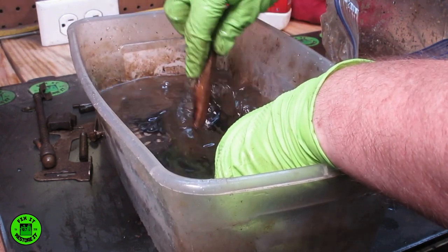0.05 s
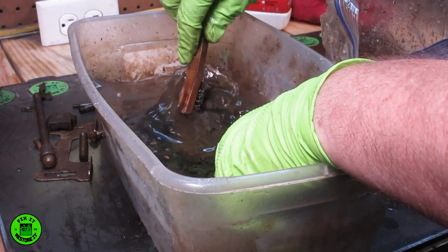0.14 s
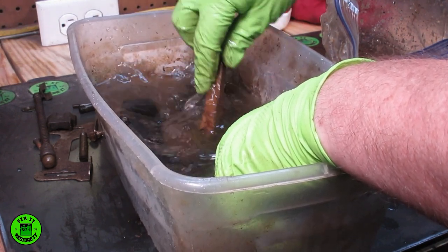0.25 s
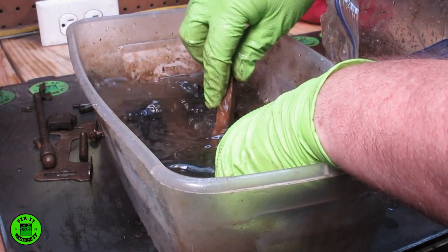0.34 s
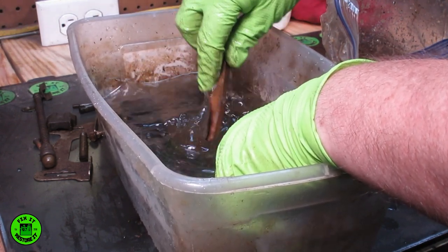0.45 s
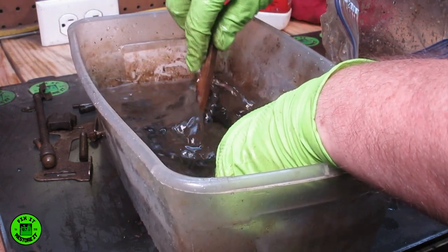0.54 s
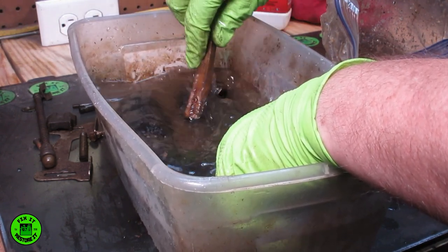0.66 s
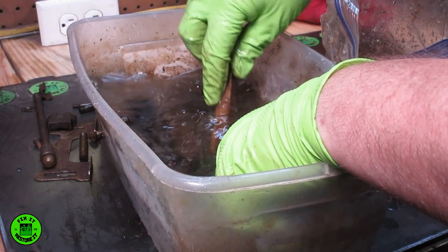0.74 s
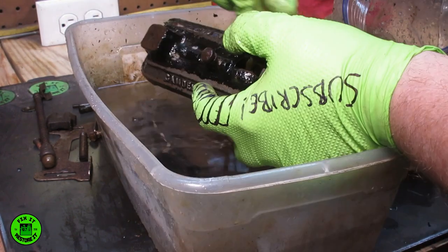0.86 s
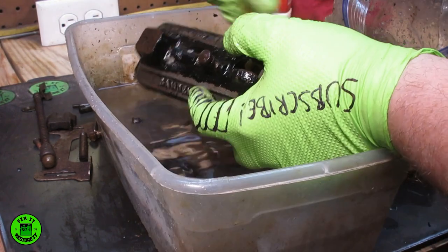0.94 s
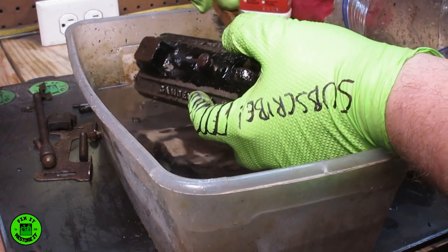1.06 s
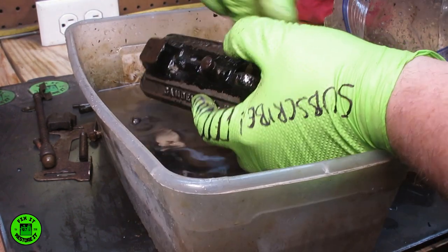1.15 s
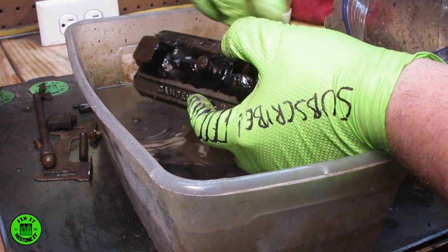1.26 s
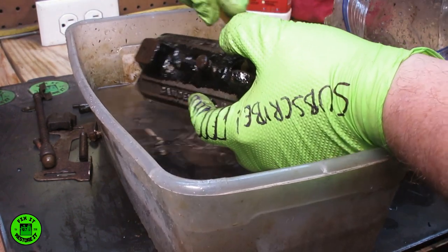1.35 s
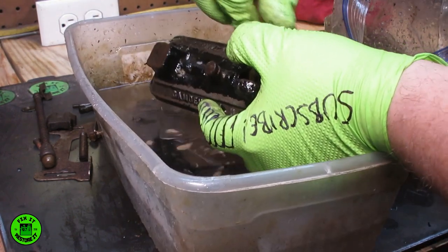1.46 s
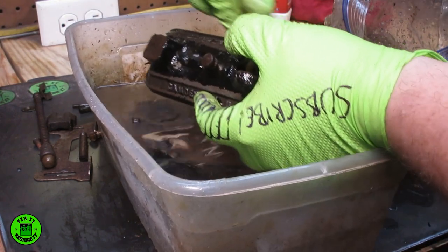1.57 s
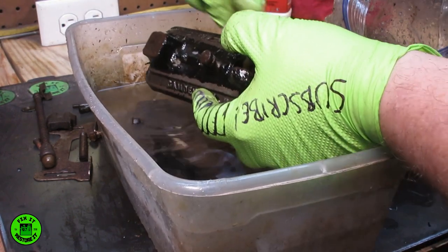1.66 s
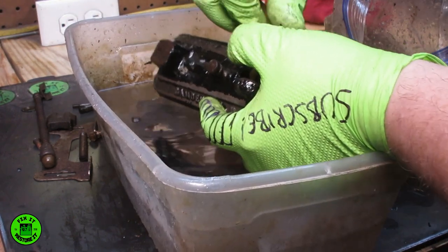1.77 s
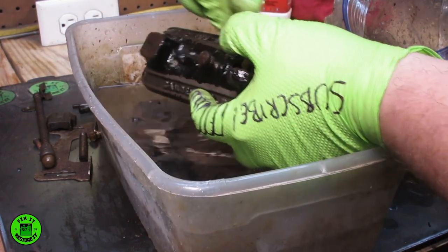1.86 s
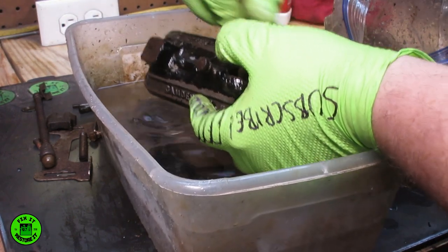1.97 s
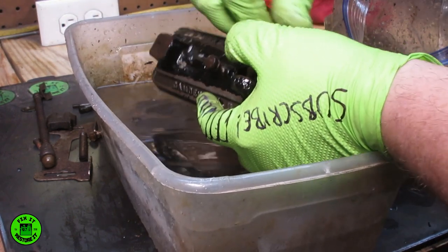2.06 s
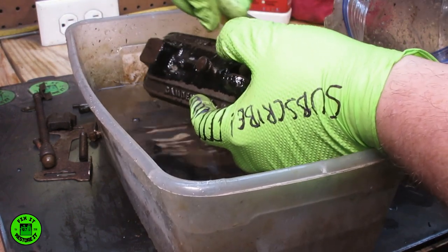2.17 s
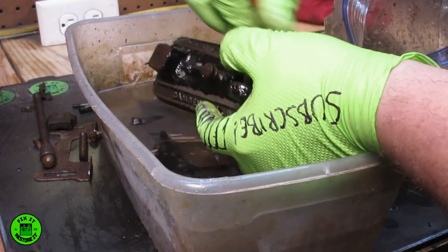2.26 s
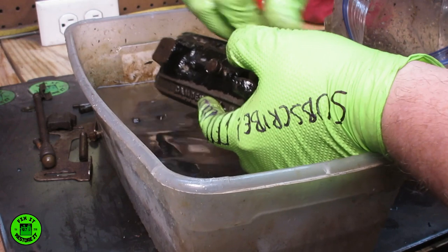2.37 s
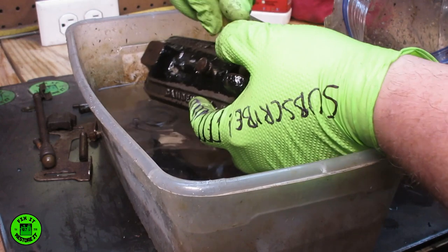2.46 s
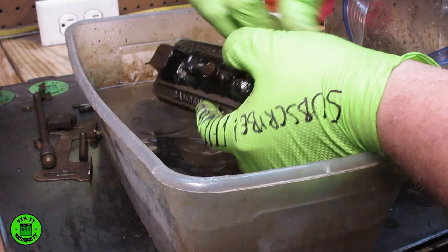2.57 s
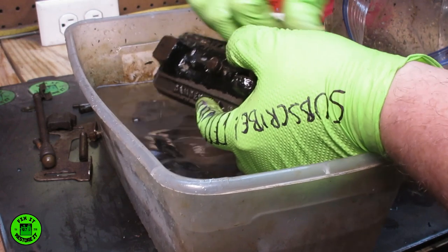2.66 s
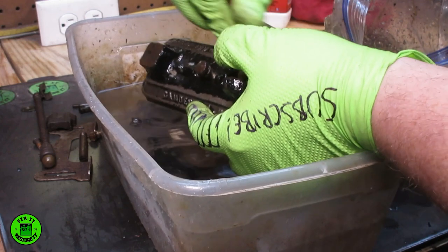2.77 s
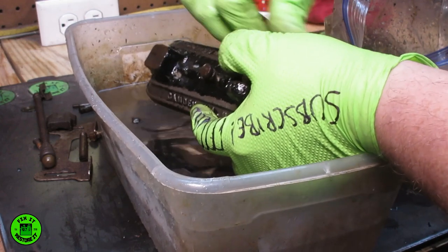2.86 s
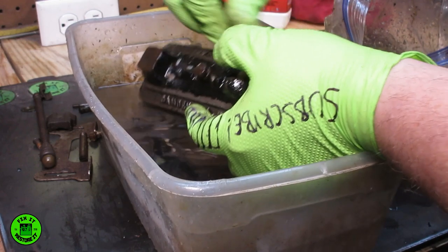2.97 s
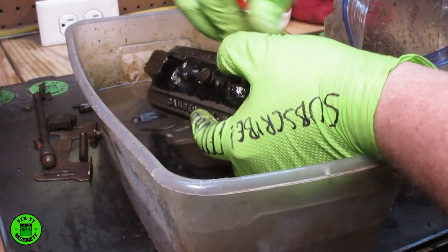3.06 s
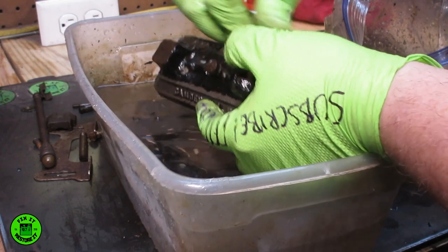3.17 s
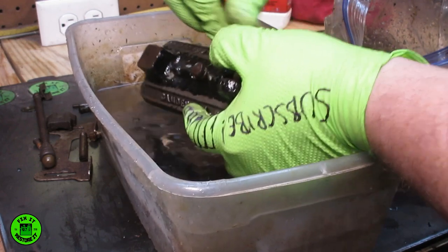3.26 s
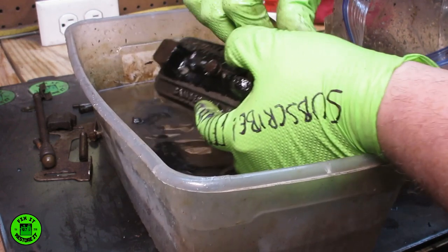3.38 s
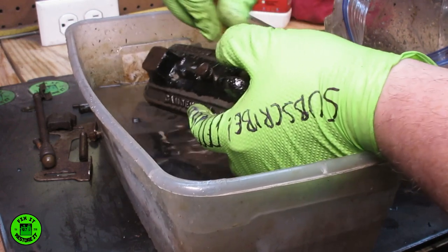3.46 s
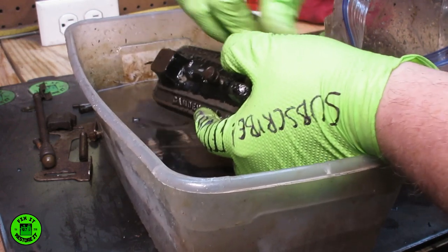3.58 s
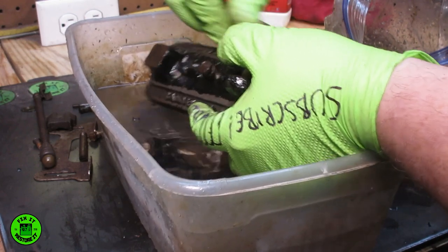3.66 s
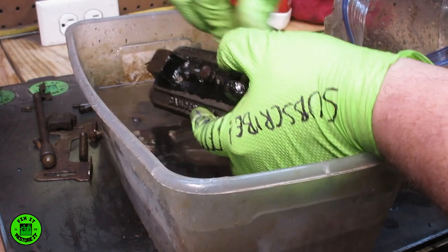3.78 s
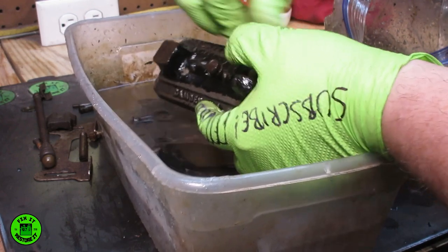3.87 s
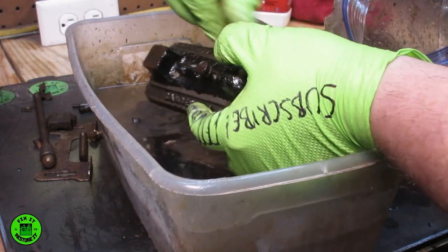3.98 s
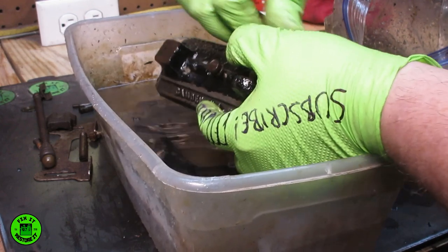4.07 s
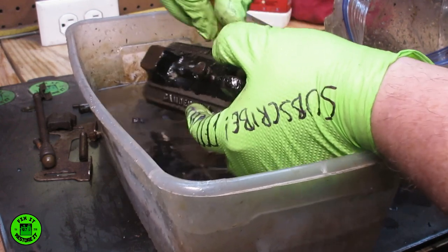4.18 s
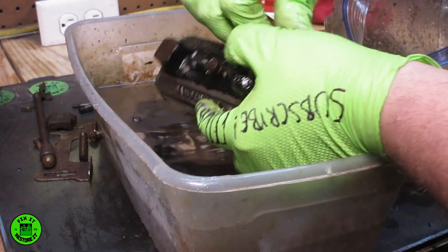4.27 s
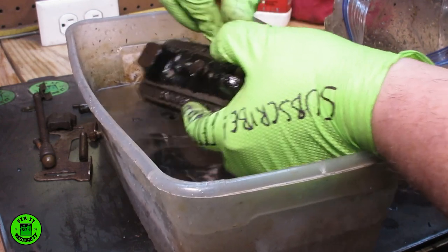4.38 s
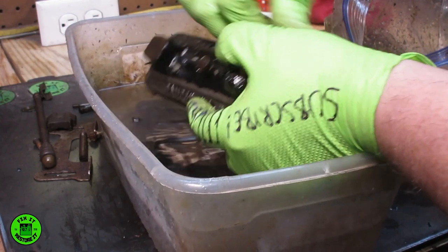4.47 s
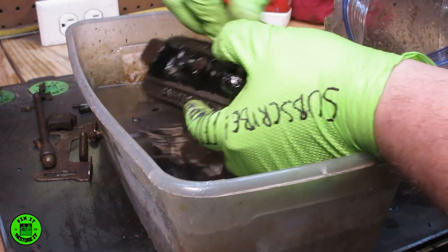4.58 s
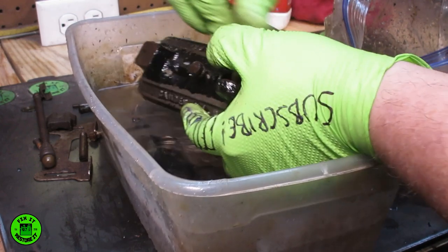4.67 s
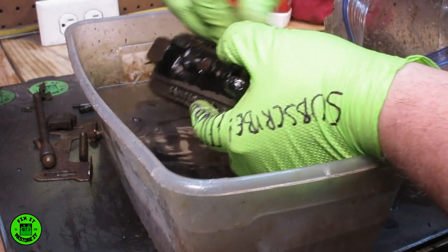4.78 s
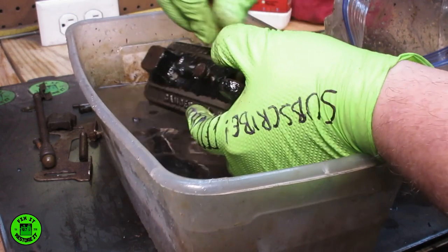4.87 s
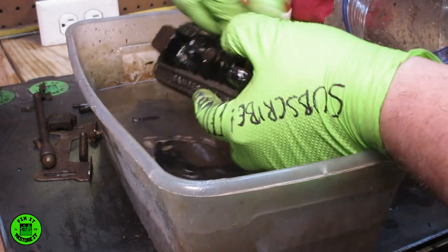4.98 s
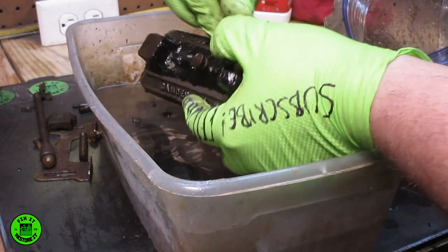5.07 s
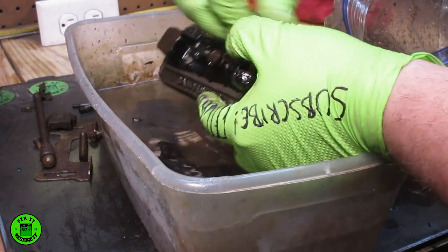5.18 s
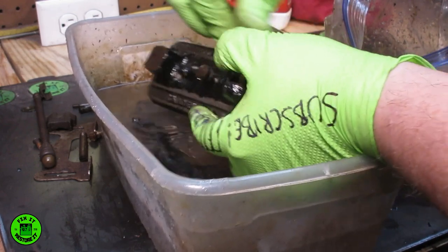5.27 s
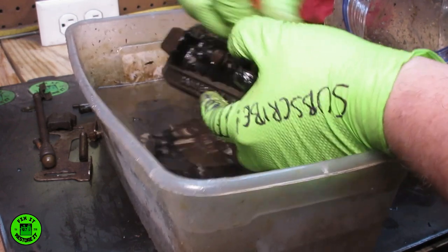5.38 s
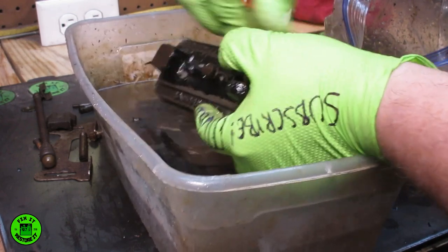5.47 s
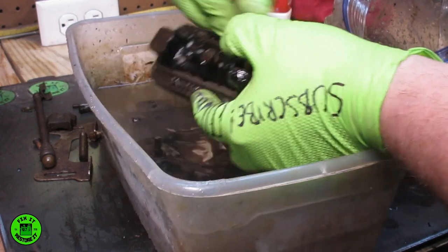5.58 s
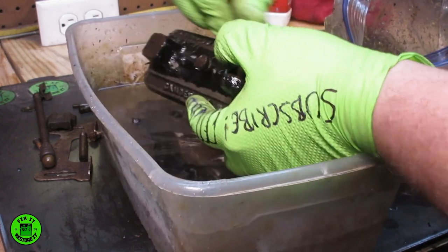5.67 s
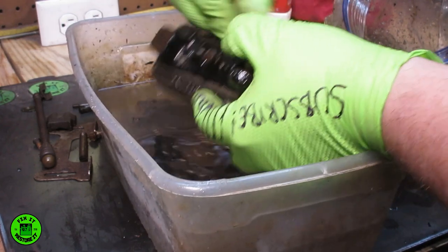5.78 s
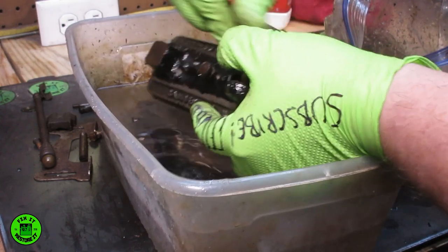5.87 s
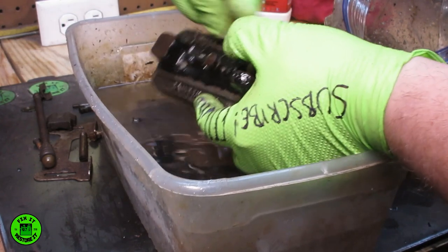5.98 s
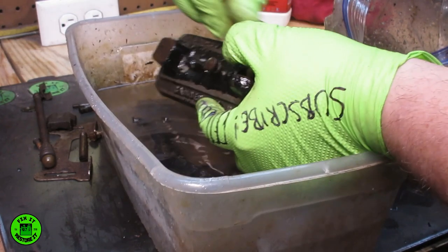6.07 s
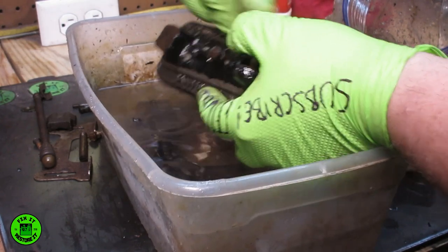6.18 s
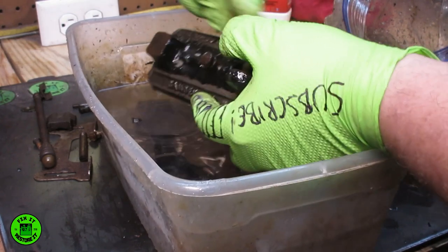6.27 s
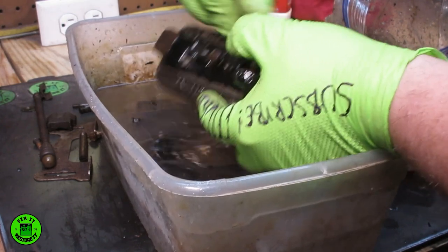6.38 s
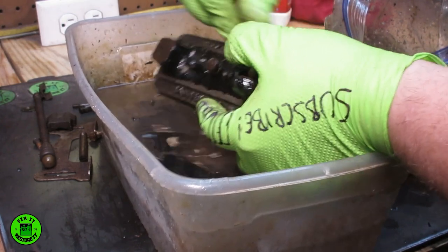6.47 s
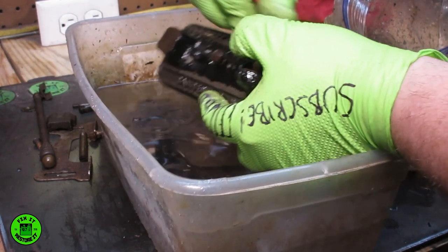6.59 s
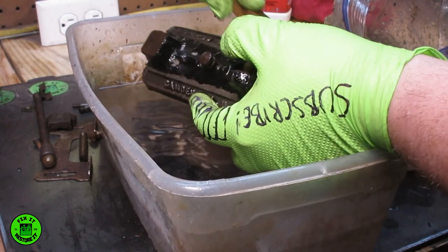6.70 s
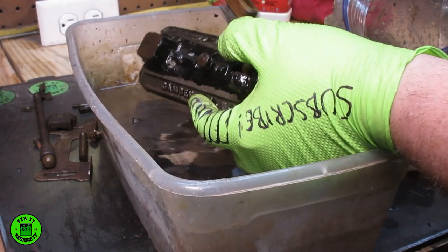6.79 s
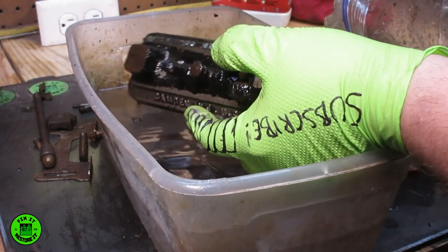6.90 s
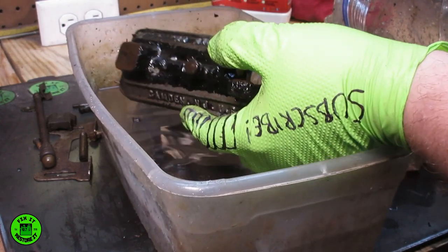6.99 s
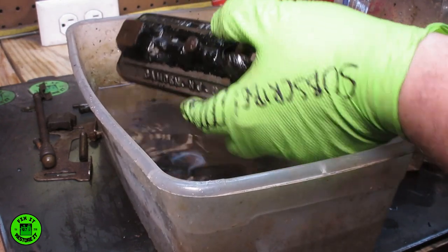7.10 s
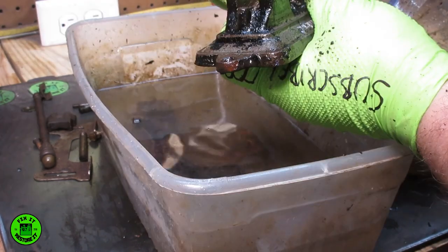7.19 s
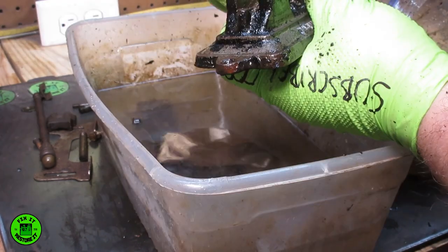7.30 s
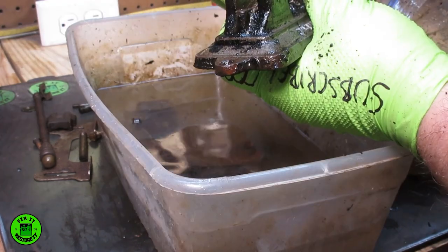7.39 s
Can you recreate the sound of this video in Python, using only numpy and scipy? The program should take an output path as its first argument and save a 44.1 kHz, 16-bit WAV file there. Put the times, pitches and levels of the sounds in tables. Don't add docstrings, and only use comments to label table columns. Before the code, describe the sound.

In a quiet workshop with a faint low machine hum, a stiff brush scrubs an iron casting in a plastic tub, heard close in mono with a very short hard echo. From 0 to 0.9 s the brush works under water: slow, dull, quiet strokes, with small bubbles and sucking gulps at the start, around 0.3-0.4 s, and thickest at 0.8-0.9 s. At 0.92 s a hard cut brings much brighter, louder scrubbing in air: crisp, hissy bristle rasps with a slight metallic ring, pushes generally stronger than pulls. Roughly seven strokes per second at first quicken to nearly ten by 4 s, loudest about 3.5-5.5 s, with scattered tuft snaps and sharp flicks, the strongest near 5.65 s. Strokes weaken from 6.2 s and trail off by 6.8 s. Room tone remains, with tiny drips at 6.9 and 7.2 s.

```python
import sys
import numpy as np
from scipy import signal
from scipy.io import wavfile
from scipy.ndimage import uniform_filter1d

SR = 44100
rng = np.random.default_rng(int(sys.argv[2]) if len(sys.argv) > 2 else 0)


def ratio(d):
    e = np.asarray(d, float) / 20
    return 10 ** e


def wav_out(sig):
    wavfile.write(sys.argv[1], SR, np.round(np.clip(np.atleast_2d(sig).T, -1, 1) * 32767).astype(np.int16))


N = 328094

CUT_S = 0.9225
BRISK_S, LAST_PLACE = 0.11, 0.31
ROOM_DB = -47

# (frequency [Hz], level [dB per Hz])
ROOM_SPECTRUM = [(15, -40), (34, -14), (46, 3), (70, -2.5), (100, -1), (240, -5), (420, -8), (800, -9),
                 (1500, -14.5), (2200, -16.5), (3500, -18.5), (5500, -25), (9000, -27), (15000, -39)]
# (frequency [Hz], width [Hz], lift [dB])
MACHINE_HUM = [(113.3, 14, 5.5), (232.2, 14, 6.5)]
# (frequency [Hz], level [dB per Hz])
WET_TIP_SPECTRUM = [(1500, -24), (3000, 0), (4500, 1), (6500, 0.5), (8500, 1), (11000, -2.5),
                    (15000, -14.5)]
WET_BODY_SPECTRUM = [(200, -18), (450, -5.5), (900, -8.5), (1600, -5.5), (2500, -6.5), (3500, -7),
                     (6000, -21.5)]
DRY_TIP_SPECTRUM = [(1500, -32.5), (3000, -15), (4500, -6), (6000, -3), (7500, -0.5), (10000, -1),
                    (12500, -4.5), (15000, -11)]
DRY_BODY_SPECTRUM = [(400, -25), (900, -12), (1400, -4), (2000, -6), (2800, 3.5), (4000, -4.5),
                     (5500, -0.5), (8000, -13)]
# (frequency [Hz], width [Hz], lift [dB])
WET_CASTING_MODES = [(2480, 110, 7.5), (2690, 95, 8), (3500, 70, 0), (4000, 90, 3.5), (4740, 160, 5.5),
                     (8640, 560, 4.5)]
DRY_CASTING_MODES = [(1150, 17, 1.7), (1975, 116, 5.8), (2150, 26, 1.2), (2527, 21, 6.4), (3190, 35, 6.4),
                     (4070, 110, 5.2), (4780, 170, 4.6), (5140, 55, 3), (6040, 60, 1.2), (7230, 200, 4.1),
                     (8130, 150, 3.7), (9450, 190, 2.5)]
# (frequency [Hz], width [Hz], level [dB])
WET_LOW_MODES = [(923, 49, -3), (1177, 27, -0.5), (1344, 22, 0.5)]
DRY_LOW_MODES = [(1412, 44, 0)]
# (turn time [s], rasp level [dB], body re rasp [dB], lowest-mode level [dB])
WET_PUSHES = [
    (-0.07, -34, -5, -43),
    (0.227, -33, -5.5, -35.5),
    (0.686, -33, -4.5, -38),
]
WET_PULLS = [
    (0.071, -34.5, -1, -36.5),
    (0.48, -35, -3, -37.5),
    (0.917, -60, -15, -40),
]
DRY_PUSHES = [(0.991, -24.5, -11, -43), (1.315, -23, -17, -38.5), (1.587, -22, -15, -41.5),
              (1.859, -22, -17, -45), (2.141, -20.5, -15, -37.5), (2.42, -20.5, -15.5, -39.5),
              (2.701, -20, -16.5, -45), (2.961, -19.5, -14.5, -38), (3.215, -21, -14.5, -42),
              (3.455, -17, -14, -39), (3.693, -19, -15.5, -44), (3.923, -20, -12.5, -55),
              (4.145, -20.5, -14.5, -46), (4.374, -18.5, -16, -41.5), (4.582, -18.5, -15, -49),
              (4.794, -16.5, -18.5, -39), (5.023, -18.5, -13, -44), (5.223, -18, -16, -48),
              (5.428, -18, -17, -37), (5.633, -19.5, -15, -50), (5.84, -18.5, -16.5, -38),
              (6.03, -18.5, -14.5, -37), (6.244, -21, -14, -42), (6.441, -21.5, -17, -40.5),
              (6.654, -26, -13.5, -49)]
DRY_PULLS = [(0.88, -30.5, -12, -54), (1.147, -24, -11.5, -41), (1.446, -25.5, -10, -43),
             (1.718, -24.5, -7.5, -52), (1.995, -24, -10, -44), (2.276, -23, -9.5, -40.5),
             (2.555, -22, -9.5, -43), (2.839, -23, -13, -44), (3.098, -22, -11, -40),
             (3.336, -22.5, -12, -50), (3.581, -20.5, -12.5, -36), (3.806, -22, -8.5, -38),
             (4.03, -20, -11.5, -43), (4.255, -20.5, -9.5, -39), (4.476, -21.5, -10, -54),
             (4.69, -21, -11, -49), (4.913, -19, -12, -41), (5.122, -20.2, -10.5, -49),
             (5.334, -20.5, -12.5, -39), (5.536, -22, -11, -41), (5.742, -21, -12, -50),
             (5.941, -23.5, -13, -45), (6.135, -23, -9, -41), (6.343, -24, -13, -44),
             (6.535, -24, -10.5, -48), (6.83, -57, -15, -78)]
# (time [s], push sharpness [exponent], pull sharpness [exponent],
# rasp at turn into push [dB], rasp at turn into pull [dB])
WET_HAND = [(-0.07, 2.6, 0.76, -52, -53), (0.227, 0.89, 0.76, -56, -59), (0.686, 1, 0.96, -61, -62)]
DRY_HAND = [(0.88, 0.88, 3.2, -51, -22), (1.15, 1.75, 2.3, -44.5, -44), (1.7, 2.35, 2, -50, -34),
            (2.2, 1, 1.33, -41.5, -40.5), (2.9, 0.96, 1.2, -43, -45), (3.55, 1.85, 1.64, -36.5, -38.5),
            (4.1, 1.4, 1.54, -43.5, -39.5), (4.4, 1.5, 1.74, -35.5, -37), (4.8, 1.54, 1.4, -36, -38),
            (5.25, 1.54, 1.3, -34.5, -35.5), (5.85, 1.46, 1.25, -33.5, -39.5), (6.2, 1.95, 1.13, -45, -37),
            (6.5, 1, 1.14, -36, -39), (6.65, 1.83, 1.3, -42, -45), (6.83, 1.8, 1, -45, -72)]
# (place of top speed [0-1], its shift [per s of extra stroke length],
# place of top ring [0-1], ring change half a stroke away [dB], middle-mode lift [dB])
WET_SWING = [
    (0.52, 0.43, 0.51, -20, 0.5),
    (0.53, 0.33, 0.48, -22, -0.5),
]
DRY_SWING = [
    (0.51, 3.5, 0.78, -9.5, 0.17),
    (0.49, -2.0, 0.35, -12, 1),
]
# (start [s], length [s], level [dB], start resonance [Hz], end resonance [Hz])
GULPS = [(0, 0.029, -37, 2300, 2600), (0.293, .04, -36, 1600, 2400), (0.332, .045, -34, 2200, 1150),
         (.37, 0.038, -34, 1300, 2000), (0.383, 0.067, -36.5, 2300, 2900), (.52, 0.093, -46, 2700, 2700),
         (.72, .12, -42, 2700, 2680), (0.831, 0.032, -28, 2100, 2300), (0.852, .04, -27.5, 2300, 2500),
         (0.875, .026, -28.5, 2300, 650), (0.894, 0.028, -35, 900, 700)]
# (time [s], peak [dB], frequency [Hz], length [s], glide [ratio])
BUBBLES = [(.001, -25, 2210, 0.0064, 1.2), (.012, -27, 2300, 0.0064, 0.83), (.020, -35, 2600, .004, 0.76),
           (.029, -33, 4760, .006, .97), (.300, -34, 1600, 0.016, 1.25), (0.322, -26, 2950, .006, 0.9),
           (0.329, -23.5, 2400, 0.0096, 0.98), (0.328, -30, 3500, .007, 1.02),
           (0.332, -33, 2000, 0.014, 0.73), (0.355, -38, 1300, 0.0086, 0.92),
           (0.384, -30, 1260, 0.0056, 1.3), (0.404, -35, 2480, 0.011, 0.81),
           (0.419, -34, 3780, 0.008, 0.83), (0.821, -27.5, 2400, 0.012, 1.02),
           (0.83, -29, 2900, .014, 0.85), (0.841, -27, 2090, 0.012, 0.84), (.851, -30, 2320, 0.0078, 1.13),
           (.860, -30, 2560, .014, 0.93), (0.877, -24, 2400, 0.011, 0.8), (.888, -31, 630, 0.0081, 1.25),
           (.914, -29, 2480, .007, 0.77), (.887, -42, 288, 0.0088, 0.82), (.575, -30, 2690, 0.0066, 1.5),
           (.588, -30, 2750, 0.0065, 0.98)]
# (time [s], peak [dB])
FLICKS = [(0.2473, -25), (0.4194, -21), (0.612, -15), (0.923, -16), (1.3279, -22), (1.6302, -26),
          (2.1294, -29), (3.246, -15), (4.8207, -12), (5.6533, -7), (5.7344, -15), (6.8394, -47)]
# (time [s], peak [dB], frequency [Hz])
SNAPS = [(1.0571, -21, 2960), (1.1883, -22, 2540), (1.378, -18, 4000), (1.7542, -22, 3000),
         (2.195, -27, 3800), (2.2998, -23, 3030), (2.432, -24, 2220), (2.5746, -38, 2610),
         (2.7248, -20, 2200), (3.6005, -24, 2820), (3.835, -21, 2620), (4.0662, -23, 3100),
         (4.2753, -32, 1990), (4.7303, -27, 3870), (4.767, -17, 2200), (5.3578, -32, 3370),
         (5.4405, -21.5, 2350), (5.9589, -26, 3150), (6.161, -19, 3190), (6.359, -23, 2760)]
# (time [s], peak [dB], frequency [Hz], length [s], glide [ratio])
DRIPS = [
    (6.927, -52, 4500, 0.0074, 1.03),
    (7.205, -54, 7000, .003, 0.97),
]


def evened(x):
    return x / np.sqrt(np.mean(x ** 2) + 1e-20)


def wander(per_s, size):
    width = int(SR / per_s)
    once = uniform_filter1d(rng.standard_normal(size), width)
    return evened(uniform_filter1d(once, width))


def slips(per_s, spread_db):
    size_db = spread_db * np.minimum(rng.exponential(1, N), 3.5)
    impulse = ratio(size_db) * rng.choice([-1., 1.], N)
    return evened(impulse * (rng.random(N) < per_s / SR))


def arch(way, place):
    warp = np.log(0.5) / np.log(np.clip(place, 0.05, 0.95))
    return abs(np.sin(np.pi * way ** warp))


def shape_db(points, modes, hz):
    point_hz, point_db = np.transpose(points)
    lift = 0
    for mode_hz, width_hz, lift_db in modes:
        lift = lift + (ratio(2 * lift_db) - 1) / (1 + (2 * (hz - mode_hz) / width_hz) ** 2)
    smooth_db = np.interp(np.log(hz + 1), np.log(point_hz), point_db)
    return smooth_db + 10 * np.log10(np.maximum(1 + lift, 0.01))


def coloured(x, points, modes):
    hz = abs(np.fft.fftfreq(8192, 1 / SR))
    log_gain = np.log(ratio(shape_db(points, modes, hz)))
    phase = -signal.hilbert(log_gain).imag
    taps = np.fft.ifft(np.exp(log_gain + 1j * phase)).real[:4096]
    return signal.oaconvolve(x, taps / np.linalg.norm(taps))[:len(x)]


def resonate(x, hz, width_hz):
    turn = np.exp(2j * np.pi * np.cumsum(hz * np.ones(len(x))) / SR)
    r = np.exp(-np.pi * width_hz / SR)
    return 2 * (turn * signal.lfilter([1 - r], [1, -r], x / turn)).real


def patchy(x, db):
    z = signal.stft(x, nperseg=512, noverlap=384)[2]
    field = uniform_filter1d(rng.standard_normal(z.shape), size=8, axis=0)
    field = uniform_filter1d(field, size=14, axis=1)
    return signal.istft(z * ratio(db * evened(field)), nperseg=512, noverlap=384)[1][:len(x)]


def workshop():
    level_db = ROOM_DB + 0.5 * wander(3.3, N)
    return ratio(level_db) * coloured(rng.standard_normal(N), ROOM_SPECTRUM, MACHINE_HUM)


def low_ring(modes, speed):
    knocks = slips(1800, 2.5) * (1.04 + speed) * ratio(1.5 * wander(50, N))
    rung = np.zeros(N)
    for hz, width_hz, db in modes:
        rung += ratio(db) * resonate(resonate(knocks, hz, width_hz), hz, 4 * width_hz)
    return evened(rung)


def brush(pushes, pulls, hand, swing, low_modes, tips, body, modes,
          slips_per_s, spread_db, lumpy_db, body_sharp, body_turn_db):
    rows = sorted([(*row, 0) for row in pushes] + [(*row, 1) for row in pulls])
    turn_s, rasp_db, body_db, ring_db, pull = np.transpose(rows)
    hand_s, *habit = np.transpose(hand)
    push_sharp, pull_sharp, push_turn_db, pull_turn_db = (np.interp(turn_s, hand_s, c) for c in habit)
    sharp = np.where(pull, pull_sharp, push_sharp)
    turn_db = np.where(pull, pull_turn_db, push_turn_db)
    place, shift, ring_place, dip_db, middle_db = np.array(swing)[pull.astype(int)].T
    place = place + shift * (np.diff(turn_s, append=turn_s[-1]) - BRISK_S)
    if turn_s[-1] > CUT_S:
        place[-2] = LAST_PLACE

    t = np.arange(N) / SR
    k = np.clip(np.searchsorted(turn_s, t) - 1, 0, len(turn_s) - 2)
    way = np.clip((t - turn_s[k]) / np.diff(turn_s)[k], 0, 1)
    speed = arch(way, place[k])
    contact = np.tanh(1.244 * speed ** (1.42 * sharp[k])) / 0.87

    rest_db = np.interp(t, turn_s, turn_db, right=-120)
    rasp = np.hypot(ratio(rasp_db[k]) * contact, ratio(rest_db))
    press = np.hypot(ratio(rasp_db[k] + body_db[k]) * contact ** body_sharp, ratio(rest_db + body_turn_db))
    rasp *= ratio(0.7 * wander(120, N))
    press *= ratio(lumpy_db * wander(49, N))

    scrub = coloured(rasp * slips(slips_per_s, spread_db), tips, modes)
    scrub += coloured(press * slips(slips_per_s / 3, spread_db), body, modes)
    middle = resonate(resonate(scrub, 4600, 2400), 4600, 2400)
    scrub += (ratio(middle_db[k]) - 1) * middle
    scrub = patchy(scrub, 1.1)

    grip_db = ring_db[k] + dip_db[k] * (2 * (way - ring_place[k])) ** 2
    grip = uniform_filter1d(ratio(grip_db) * (t < turn_s[-1]), size=300)
    return scrub + ratio(-6.5) * grip * low_ring(low_modes, speed)


def slurp():
    out = np.zeros(N)
    froth = slips(2500, 3.2)
    wobble = 1 + 0.081 * wander(150, N)
    for start_s, length_s, db, from_hz, to_hz in GULPS:
        u = np.linspace(0, 1, int(length_s * SR))
        start = round(start_s * SR)
        at = slice(start, start + len(u))
        gap_hz = from_hz * (to_hz / from_hz) ** u * wobble[at]
        rung = resonate(resonate(froth[at], gap_hz, 660), gap_hz, 1300)
        out[at] += ratio(db) * arch(u, 0.58) ** 1.4 * evened(rung)
    return out


def bubbles(rows):
    out = np.zeros(N)
    for (s, db, hz, length_s, glide), sizes in zip(rows, rng.standard_normal((len(rows), 3))):
        u = np.linspace(0, 1, int(length_s * SR))
        detune = 1 + np.array([0.01, 0.07, 0.09]) * sizes
        turns = np.cumsum(hz * glide ** u) / SR * detune[:, None]
        tone = ratio([0, -6, -8]) @ np.sin(2 * np.pi * turns)
        out[round(s * SR):][:len(u)] += ratio(db) * tone * np.sin(np.pi * u ** 0.5)
    return out


def tub(x, echo_db, t60_s):
    t = np.arange(6000) / SR
    taps = rng.choice([-1., 1.], (3, len(t))) * (rng.random((3, len(t))) < 0.05)
    taps *= ratio(-60 * t / t60_s) * (t > 0.0015)
    cycles = 1.7 * np.arange(N) / SR + np.arange(3)[:, None] / 3
    spot = np.cos(2 * np.pi * cycles) * np.sqrt(2 / 3)
    echo = signal.oaconvolve(x * spot, taps / np.linalg.norm(taps[0]), axes=1)[:, :N].sum(0)
    return x + ratio(echo_db) * echo


def flicks():
    out = np.zeros(N)
    t = np.arange(400) / SR
    for (s, db), burst in zip(FLICKS, rng.standard_normal((len(FLICKS), 400))):
        envelope = ratio(db - 8.5 - 60 * t / 0.028) * np.minimum(t / 0.0007, 1)
        out[round(s * SR):][:len(t)] += envelope * burst
    return coloured(out, DRY_TIP_SPECTRUM, DRY_CASTING_MODES)


def snaps():
    out = np.zeros(N + SR)
    t = np.arange(500) / SR
    for (s, db, hz), burst in zip(SNAPS, rng.standard_normal((len(SNAPS), 500))):
        burst = burst * ratio(-60 * t / 0.098) * np.minimum(t / 0.002, 1)
        ring = resonate(resonate(burst, hz, 630), hz, 900)
        out[round(s * SR):][:len(t)] += ratio(db - 4.5) * ring / abs(ring).max()
    return out[:N]


def scene():
    wet = brush(WET_PUSHES, WET_PULLS, WET_HAND, WET_SWING, WET_LOW_MODES,
                WET_TIP_SPECTRUM, WET_BODY_SPECTRUM, WET_CASTING_MODES,
                slips_per_s=9000, spread_db=2.8, lumpy_db=1.6, body_sharp=1.0, body_turn_db=-1.5)
    wet += slurp() + bubbles(BUBBLES)
    in_air = brush(DRY_PUSHES, DRY_PULLS, DRY_HAND, DRY_SWING, DRY_LOW_MODES,
                   DRY_TIP_SPECTRUM, DRY_BODY_SPECTRUM, DRY_CASTING_MODES,
                   slips_per_s=14000, spread_db=2.2, lumpy_db=2.1, body_sharp=0.63, body_turn_db=-6)
    in_air += snaps() + bubbles(DRIPS)
    before = np.arange(N) < CUT_S * SR
    work = np.where(before, tub(wet, echo_db=-14, t60_s=0.097), tub(in_air, echo_db=-11, t60_s=0.12))
    mono = work + workshop() + flicks()
    return np.array([mono, mono])


def band_limit(x):
    return signal.sosfilt(signal.butter(12, 16340, fs=SR, output="sos"), x)


def record(dry):
    edge = signal.firwin(601, 14990, window=("kaiser", 4), fs=SR)
    mix = signal.oaconvolve(dry, edge[None], "same")
    return band_limit(mix)


dry = scene()
out = record(dry)
wav_out(out)
```